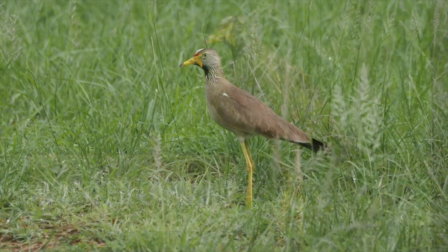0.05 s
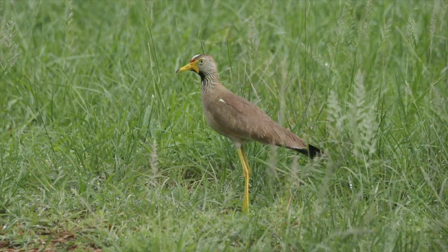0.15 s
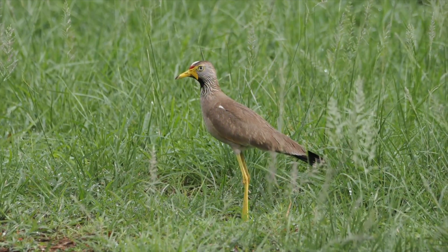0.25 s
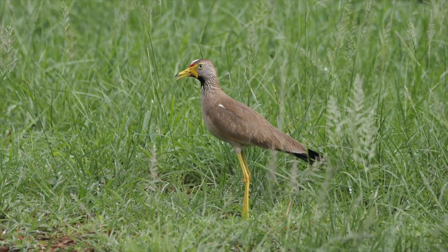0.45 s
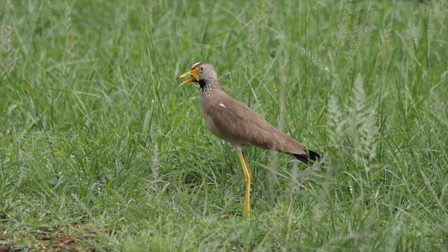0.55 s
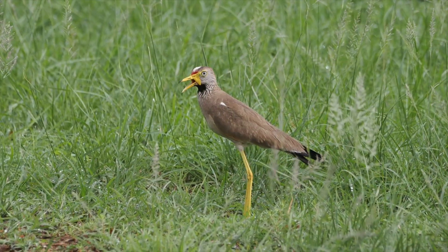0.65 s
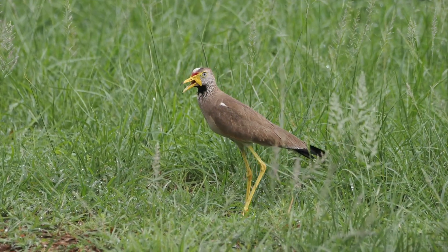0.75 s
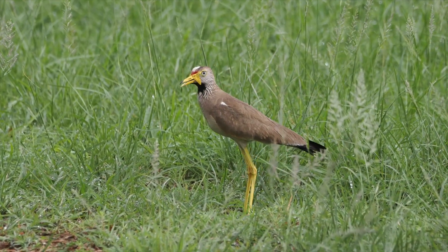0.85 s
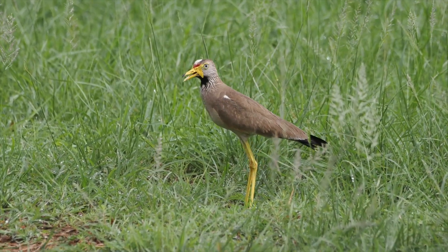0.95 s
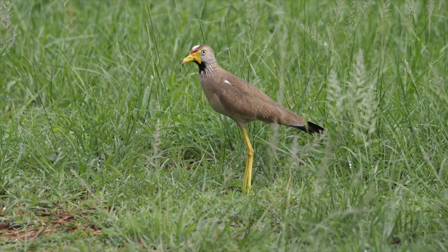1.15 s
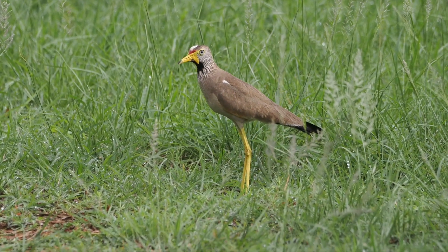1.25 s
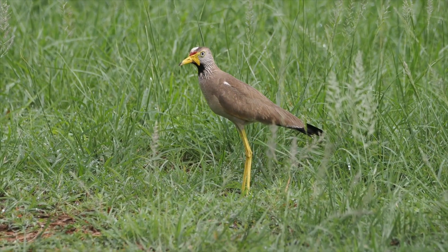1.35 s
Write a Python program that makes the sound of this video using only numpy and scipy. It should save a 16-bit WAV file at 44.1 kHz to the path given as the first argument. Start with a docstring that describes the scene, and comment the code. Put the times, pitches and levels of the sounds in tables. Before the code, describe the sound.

A wading bird in open grassland gives one long, thin, falling whistle, then four harsh, reedy yelps with a short echo. Behind it are a distant rumble, soft hiss and faint insects, while light wind bumps the microphone.

```python
"""A wading bird calls in open grassland, heard in stereo.
From the start there are a distant rumble, a faint hum, a soft outdoor hiss and far-off insects.
Then comes one long, thin, falling whistle, and light puffs of wind begin to bump the microphone.
The whistle runs into four harsh, yelping notes: reedy stacks of overtones that turn shrill as the
pitch rises. The field returns a short echo of each call, and the background carries on alone."""
import sys
import numpy as np
from scipy import signal
from scipy.fft import rfft, irfft
from scipy.io import wavfile
from scipy.ndimage import uniform_filter1d

SR = 44100
rng = np.random.default_rng(int(sys.argv[2]) if len(sys.argv) > 2 else 0)


def output_pcm(signal):
    """Save a mono or channel-first signal as 16-bit PCM at the path in sys.argv[1].

    Samples are clipped to [-1, 1] before scaling.
    """
    pcm = np.clip(np.atleast_2d(signal).T, -1, 1) * 32767
    wavfile.write(sys.argv[1], SR, np.round(pcm).astype(np.int16))


N = 61739
T = np.arange(N) / SR
HZ = np.fft.rfftfreq(N, 1 / SR)
NOTE_FADE_S, JITTER, JITTER_HZ = 0.0059, 0.004, 520  # jitter is a tiny random shake of the pitch


def amp(db):
    """Turns decibels into a number to multiply by."""
    return 10 ** (np.asarray(db) / 20)


def unit(x):
    """Scales a signal to an average (rms) strength of 1."""
    return x / np.sqrt(np.mean(x ** 2) + 1e-20)


def at_hz(table, hz, column=1):
    """Reads a table at any frequency, joining its rows on a scale of octaves."""
    rows = np.array(table)
    return np.interp(np.log(hz + 1), np.log(rows[:, 0] + 1), rows[:, column])


def curves(table):
    """Joins a table's moments with straight lines: one curve for each column after the time."""
    times, *columns = np.transpose(table)
    return [np.interp(T, times, column) for column in columns]


def gate(table, fade_s):
    """Fades in at a table's first moment and out at its last."""
    return np.clip(np.minimum(T - table[0][0], table[-1][0] - T) / fade_s + .5, 0, 1)


def band(hz, width_hz):
    """Noise of strength 1 around one frequency; around 0 Hz it serves as a random wobble."""
    return unit(irfft(rfft(rng.standard_normal(N)) * np.exp(-2 * ((HZ - hz) / width_hz) ** 2), N))


def rumble_and_hiss():
    """A distant rumble, nearly alike in both ears, under a wide, gently patchy hiss."""
    # tone colour of the open air: f/Hz, relative level/dB
    colour = [(15, -21), (25, 0.5), (82, -2.5), (173, -9.5), (209, -5.5), (239, -12.5), (389, -14),
              (469, -15), (582, -18.5), (2360, -32), (2700, -29), (4040, -32.5), (15500, -52)]
    # how alike the two sides are: f/Hz, likeness (-1 to 1)
    likeness = [(60, 0.94), (130, 1), (290, 0.91), (640, 0.76), (1400, 0.54), (3100, -0.53), (6800, -0.19),
                (15000, -0.36)]
    # which side is louder: f/Hz, left minus right/dB
    balance = [(700, 0), (1300, -1), (8000, 1.5), (13000, -9.5)]
    # how the deep rumble swells: t/s, level change/dB
    swell = [(0, -3.5), (.17, 3.5), (.6, 2.5), (.8, 3), (1.02, 4.5), (1.4, -2)]
    frame, hop, rumble_top_hz = 2048, 512, 257
    hz = np.fft.rfftfreq(frame, 1 / SR)
    noise = rng.standard_normal((5, N // hop + 5, len(hz)))  # five grids of time by frequency
    left, other = noise[0] + 1j * noise[1], noise[2] + 1j * noise[3]
    patches_db = 2 * unit(uniform_filter1d(uniform_filter1d(noise[4], 7, axis=0), 16, axis=1))
    alike = np.clip(at_hz(likeness, hz), -1, 1)
    right = alike * left + np.sqrt(1 - alike ** 2) * other
    lean = amp(at_hz(balance, hz) / 2)
    spectra = np.array([left * lean, right / lean])
    spectra *= amp(at_hz(colour, hz) + patches_db) / np.sqrt(1 + np.maximum(alike, -.5)) * (hz > 0)
    swell_db = np.interp(np.arange(len(left)) * hop / SR, *np.transpose(swell))
    spectra *= amp(swell_db[:, None] / (1 + (hz / rumble_top_hz) ** 2))
    air = signal.istft(spectra.transpose(0, 2, 1), nperseg=frame, noverlap=frame - hop)[1][:, :N]
    return amp(-43.5) * unit(air)


def hum():
    """A faint, distant hum: low noise so narrow that it has a pitch."""
    # bands of the hum: f/Hz, width/Hz, level/dB
    bands = [(55.5, 1.5, -50.5), (217.6, 17, -61)]
    return sum(amp(db) * band(hz, width_hz) for hz, width_hz, db in bands)


def hush_and_insects():
    """An even hush and high insects far off in the grass: steady noise, different in each ear."""
    # the hush, then the insects: f/Hz, width/Hz, level/dB
    bands = [(1580, 370, -63), (8230, 1500, -68.5)]
    return sum(amp(db) * np.array([band(hz, width_hz) for _ in range(2)]) for hz, width_hz, db in bands)


def whistle():
    """A thin tone whose octave (twice its pitch) melts into a narrow hiss as the pitch sinks."""
    # path of the whistle: t/s, pitch/Hz, base tone level/dB, octave level/dB
    path = [(0.125, 2600, -49.5, -60), (0.139, 2728, -52, -43.5), (0.161, 2769, -51.5, -44.5),
            (0.189, 2802, -70, -39.5), (0.251, 2762, -47.5, -45), (0.293, 2693, -56, -42.5),
            (0.313, 2664, -44.5, -49), (0.351, 2565, -50.5, -54.5), (0.369, 2527, -47.5, -56.5),
            (0.447, 2390, -48, -61), (0.493, 2320, -50, -64.5), (0.518, 2240, -53.5, -69),
            (0.535, 2193, -56, -75)]
    # the faint tone at three times the pitch: t/s, level/dB
    third_tone = [(.14, -75), (.2, -60), (.36, -67), (.47, -73)]
    # the octave gives way to hiss: t/s, share of hiss (0 to 1)
    hiss_share = [(.26, .04), (.33, .35), (.39, 1)]
    # each of the three tones at the microphone: left gain/dB, right gain/dB, right lag/radians
    sides = [(7.5, 0, 1.96), (1.5, -6.5, 2), (-4, -4.5, 0.81)]
    smooth_samples = 1 + round(0.011 * SR)
    hz, base_db, octave_db = [uniform_filter1d(curve, smooth_samples) for curve in curves(path)]
    airy = curves(hiss_share)[0]
    phase = 2 * np.pi * np.cumsum(hz * (1 + 0.0016 * band(0, 260))) / SR
    third_level = amp(curves(third_tone)[0]) * (1 + band(0, 430))
    levels = [amp(base_db), amp(octave_db) * np.sqrt(1 - airy ** 2), third_level]
    hiss = np.array([band(hz=5420, width_hz=280) for _ in range(2)])
    sound = hiss * airy * amp(octave_db + 8.5)
    for k, (level, (left_db, right_db, lag)) in enumerate(zip(levels, sides), 1):
        tone = np.array([amp(left_db) * np.sin(k * phase), amp(right_db) * np.sin(k * phase - lag)])
        sound += np.sqrt(2) * level * tone
    return sound * gate(path, fade_s=0.0042)


def field_echo(call):
    """The ground and the grass throw back a few faint echoes and a short, scattered tail."""
    # single echoes: delay/s, left gain/dB, right gain/dB
    echoes = [(.011, -21, -45), (.029, -17.5, -24.5), (.05, -24, -50)]
    # tone colour of the tail: f/Hz, relative level/dB
    colour = [(1000, -4.5), (2300, 13.5), (4200, -1.5), (5600, 3), (7200, 14.5), (12000, 8.5)]
    rise_s, fade_60_db_s, tail_db = 0.032, 0.37, -6.5
    t = T[:SR // 2]
    scatter = irfft(rfft(rng.standard_normal((2, N))) * amp(at_hz(colour, HZ)), N)
    tail = scatter[:, :len(t)] * np.minimum(t / rise_s, 1) * amp(-60 * t / fade_60_db_s)
    tail *= amp(tail_db) / np.linalg.norm(tail, axis=1, keepdims=True)
    for delay, left_db, right_db in echoes:
        tail[:, round(delay * SR)] += amp([left_db, right_db])
    return signal.fftconvolve(call, tail, axes=1)[:, :N]


def wind_puffs():
    """Wind bumps the microphone with short, soft puffs of deep noise, the same on both sides."""
    # the puffs: t/s, half length/s, level/dB
    puffs = [(.243, .014, -42), (.289, .011, -42), (.375, .03, -43), (.668, .018, -42), (.908, .024, -41),
             (1.117, .011, -39)]
    sound = np.zeros(N)
    for middle_s, half_s, db in puffs:
        swell = np.exp(-((T - middle_s) / half_s) ** 2)
        puff = band(hz=52.7, width_hz=80) * swell
        sound += amp(db) * puff * np.linalg.norm(swell) / np.linalg.norm(puff)
    return sound


def harsh_note(path, second_db):
    """One yelp: fluttering overtones and a puff of noise in each vibration, shaped by the throat."""
    # how the throat and beak colour the voice: f/Hz, relative level/dB
    throat = [(900, -20), (1700, -13), (2300, -5.5), (2900, -17.5), (3500, -8), (4400, -4.5), (4900, -5.5),
              (5500, -6), (6200, -13.5), (7300, -22.5), (8500, -25), (9900, -39), (11300, -30.5),
              (12600, -25.5), (14000, -41), (15500, -54)]
    # the voice cracks early in each note and at the top of the loudest: t/s, half length/s, strength
    cracks = [(0.54, 0.012, 0.37), (0.6218, 0.0029, 1), (0.6998, 0.0017, 0.53), (0.7038, 0.0011, 0.27),
              (0.767, 0.0019, 0.61), (0.945, 0.0023, 1)]
    warble_hz, flutter_hz, flutter_db = 270, 128.83, 2
    shrill_hz, focus_hz, focus_width_hz, db_per_octave = 1354, 5290, 400, 20.5
    hz, base_db, overtones_db = curves(path)
    # a crack makes the note louder, warbling and scratchy for an instant
    crack = sum(strength * np.exp(-((T - s) / half_s) ** 4) for s, half_s, strength in cracks)
    overtones_db += 3 * crack
    wobble = JITTER * band(0, 2 * JITTER_HZ) + .08 * crack * np.sin(2 * np.pi * warble_hz * T)
    hz = uniform_filter1d(hz, size=130) * (1 + wobble)
    phase = 2 * np.pi * np.cumsum(hz) / SR
    k = np.arange(2, 15)[:, None]  # overtones lie at 2 to 14 times the pitch
    # below shrill_hz the beak narrows and only overtones near focus_hz stay strong
    off_focus = 1 - np.exp(-((k * hz - focus_hz) / focus_width_hz) ** 2)
    beak_db = db_per_octave * np.log2(hz / shrill_hz) * off_focus
    random_rows = rng.standard_normal((len(k), N // 20))
    flutter = np.array([np.interp(T * flutter_hz, np.arange(len(row)), row) for row in random_rows])
    weights = amp(at_hz(throat, k * hz) + beak_db + flutter_db * flutter + second_db * (k == 2))
    lag = 0.416 * k ** 2  # the throat delays the higher overtones a little
    overtones = (weights * np.cos(k * phase - lag)).sum(0) / np.linalg.norm(weights, axis=0)
    puffs = rng.standard_normal(N) * (1 + np.cos(phase))
    rasp = unit(irfft(rfft(puffs) * amp(at_hz(throat, HZ)), N))
    rasp_level = amp((overtones_db + base_db) / 2 - 14) + crack * amp(overtones_db - 6)
    voice = np.sqrt(2) * (amp(base_db) * np.cos(phase) + amp(overtones_db) * overtones)
    tremble = 1 + .09 * band(0, 1250)
    return (voice * tremble + rasp_level * rasp) * gate(path, NOTE_FADE_S)


def yelps():
    """Four harsh notes reach the microphone's two sides with slightly different strength and timing."""
    # one path for each note: t/s, pitch/Hz, base tone level/dB, overtone level/dB
    paths = [
        [(0.503, 781.5, -49, -51), (0.522, 860, -48.5, -48), (0.531, 952, -42.5, -40.5),
         (0.543, 1037, -40, -41), (0.559, 1110, -38.5, -32), (0.57, 1230, -39, -33), (0.578, 1260, -49, -26.5),
         (0.585, 1237, -50, -31), (0.588, 1210, -41, -48)],
        [(0.622, 847.4, -50, -51), (0.626, 924, -51, -45), (0.63, 1175, -42, -33.5), (0.637, 1163, -39.5, -35),
         (0.651, 1057, -42, -43), (0.661, 1093, -40.5, -40.5), (0.679, 1265, -39.5, -32),
         (0.695, 1423, -41, -25), (0.699, 1337, -41, -23.5), (0.703, 1370, -39, -26.5),
         (0.705, 1471, -42.5, -17.5), (0.71, 1483, -44.5, -20), (0.718, 1432, -46, -23),
         (0.722, 1335, -39, -33)],
        [(0.766, 880, -50, -60), (0.77, 992, -43.5, -43), (0.773, 1280, -46, -30.5),
         (0.781, 1300, -42.5, -31.5), (0.798, 1046, -42, -41.5), (0.811, 1010, -45.5, -35),
         (0.816, 1156, -39, -38), (0.832, 1242, -43.5, -33.5), (0.845, 1387, -43, -24.5),
         (0.856, 1411, -39.5, -25.5), (0.863, 1410, -46, -25), (0.868, 1270, -61, -46)],
        [(0.945, 923, -42, -49), (0.952, 1235, -48.5, -33.5), (0.96, 1202, -39, -36.5),
         (0.979, 999.5, -43, -39.5), (0.991, 970, -49, -42.5), (1.005, 1107, -41, -37),
         (1.018, 1160, -46.5, -39), (1.033, 1022, -45.5, -39.5), (1.039, 1010, -57, -60)],
    ]
    # the overtone at twice the pitch, one value for each note: level change/dB
    second_dbs = [-10.5, -6.5, -4.5, -4.5]
    # the bird at the microphone: f/Hz, left minus right/dB, left lead/radians
    sides = [(1010, -1, 0.18), (1270, 2, -0.47), (2090, -4, -1.46), (3380, -0.5, -0.41), (3740, 1, -1.34),
             (4700, -4.5, -0.78), (5230, -2.5, -0.29), (6950, 5, -1.4), (7500, 0.5, -1.53),
             (12500, -6.5, -1.26)]
    notes = sum(harsh_note(path, db) for path, db in zip(paths, second_dbs))
    lean = amp(at_hz(sides, HZ) / 2) * np.exp(.5j * at_hz(sides, HZ, column=2))
    pair = np.array([lean, 1 / lean])
    return irfft(rfft(notes) * pair / np.sqrt(np.mean(abs(pair) ** 2, 0)), N)


def side_tone():
    """A weak, slightly unsteady pure tone glides on its own beside the third yelp."""
    # path of the tone: t/s, pitch/Hz, level/dB
    path = [(.818, 1590, -60), (.832, 1778, -52), (.844, 1990, -59), (.856, 1760, -57), (.867, 1810, -52)]
    hz, db = curves(path)
    phase = 2 * np.pi * np.cumsum(hz * (1 + JITTER * band(0, JITTER_HZ))) / SR
    return np.sqrt(2) * amp(db) * np.sin(phase) * gate(path, NOTE_FADE_S)


def scene():
    """The whistle and the yelps with their echoes, over the background and the wind."""
    thin, harsh = whistle(), yelps()
    bird = thin + harsh + side_tone() + field_echo(harsh + amp(-8.5) * thin)
    return bird + rumble_and_hiss() + hum() + hush_and_insects() + wind_puffs()


def record(dry):
    """The recorder cuts off the very highest treble."""
    cutoff_hz = 15700
    low_pass = signal.firwin(511, cutoff_hz, window=("kaiser", 9), fs=SR)
    return signal.oaconvolve(dry, low_pass[None], "same")


dry = scene()
out = record(dry)
output_pcm(out)
```